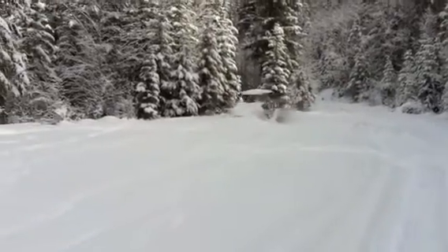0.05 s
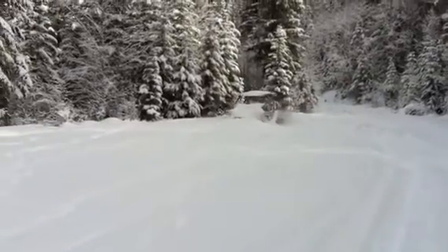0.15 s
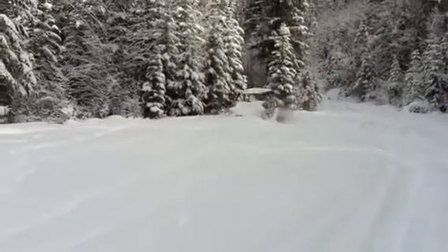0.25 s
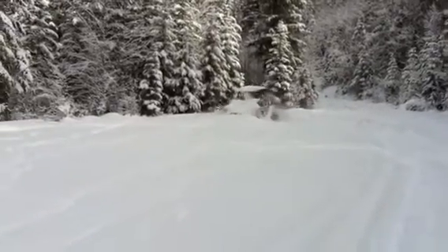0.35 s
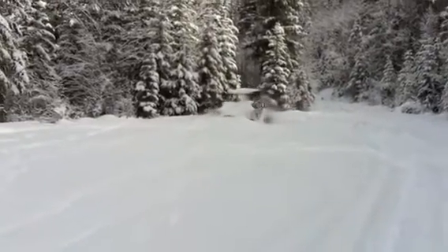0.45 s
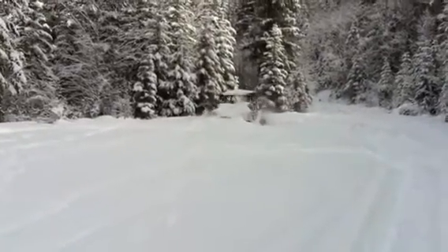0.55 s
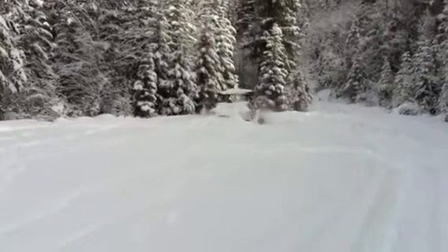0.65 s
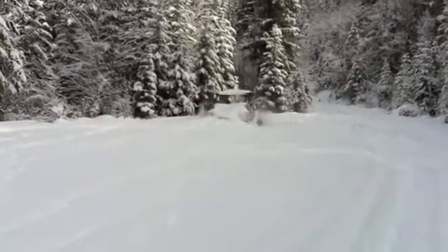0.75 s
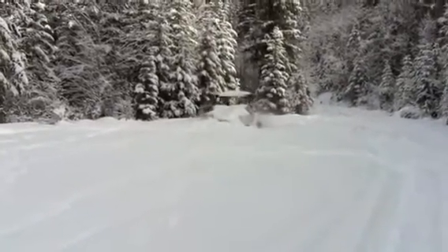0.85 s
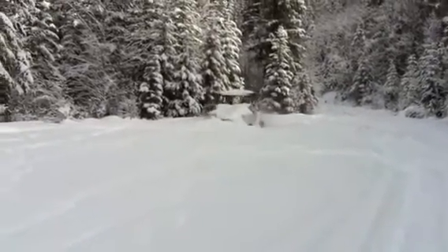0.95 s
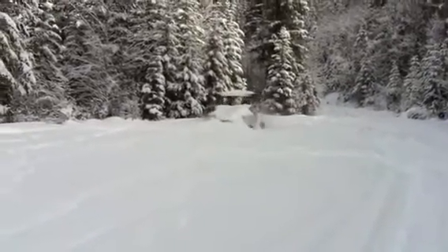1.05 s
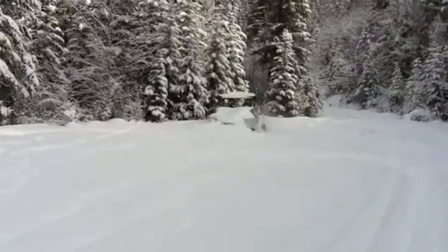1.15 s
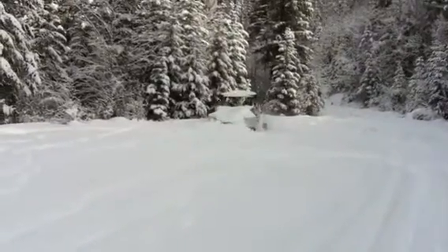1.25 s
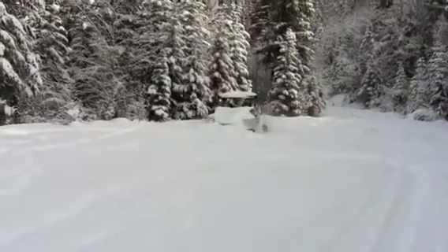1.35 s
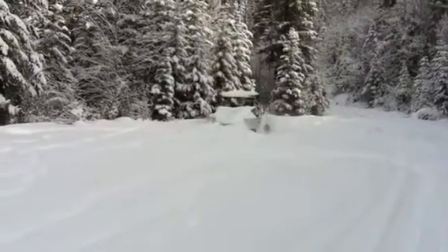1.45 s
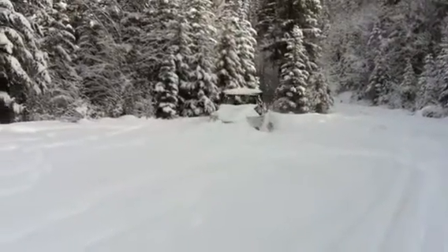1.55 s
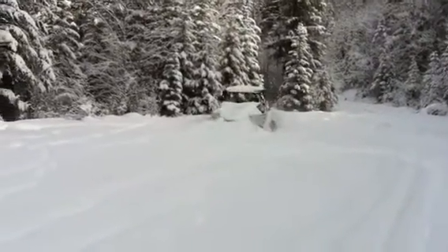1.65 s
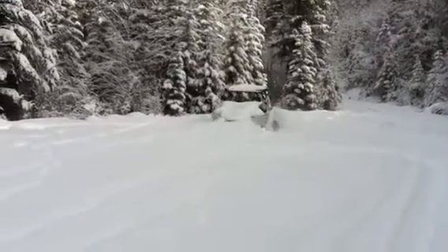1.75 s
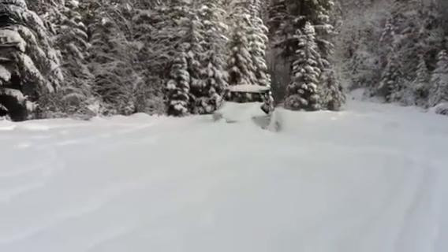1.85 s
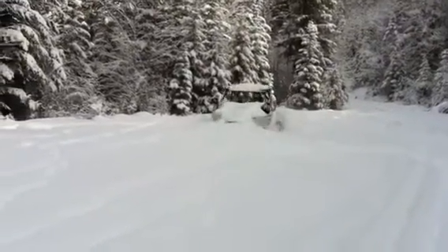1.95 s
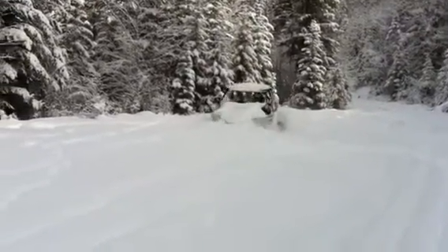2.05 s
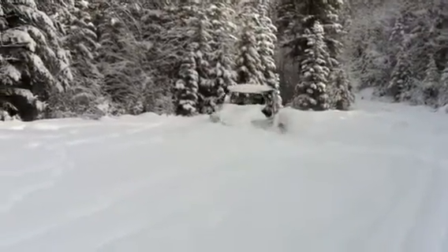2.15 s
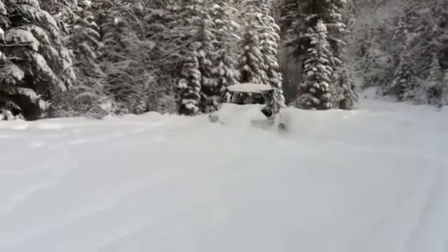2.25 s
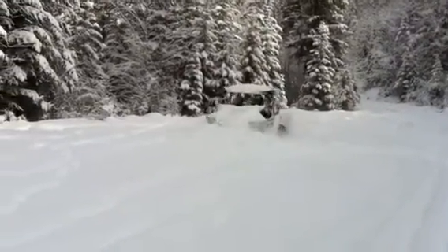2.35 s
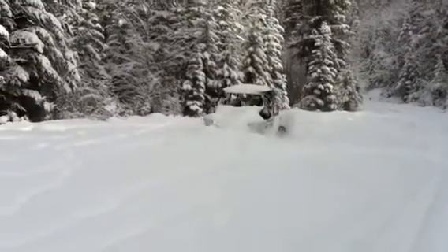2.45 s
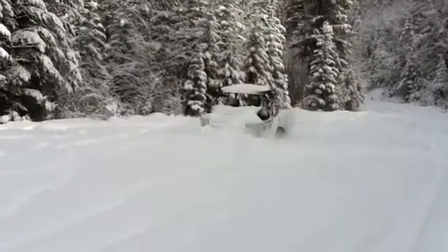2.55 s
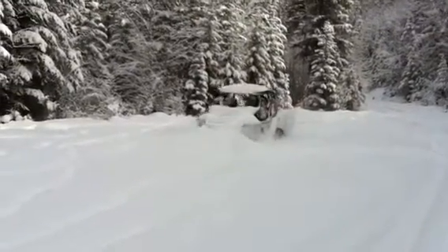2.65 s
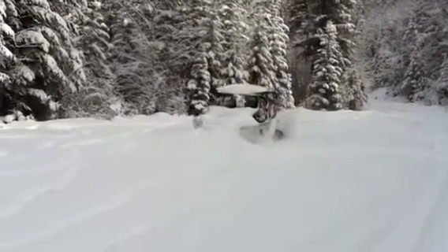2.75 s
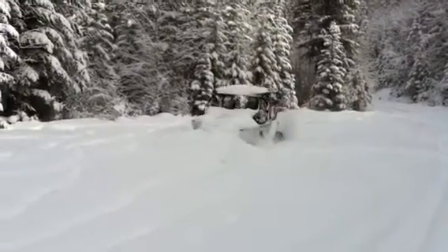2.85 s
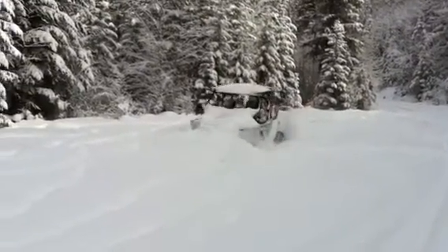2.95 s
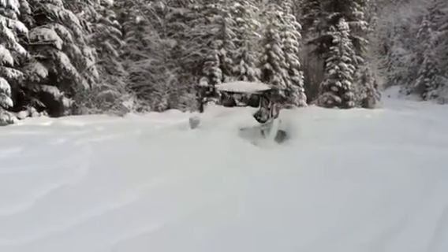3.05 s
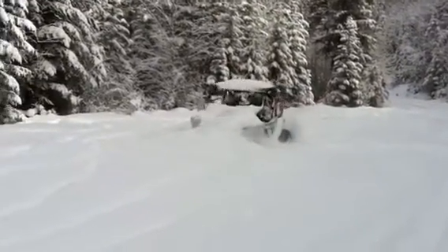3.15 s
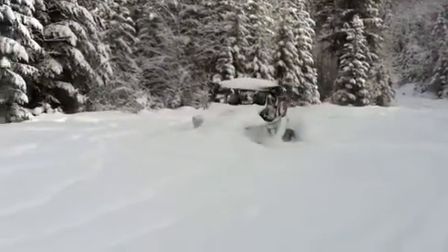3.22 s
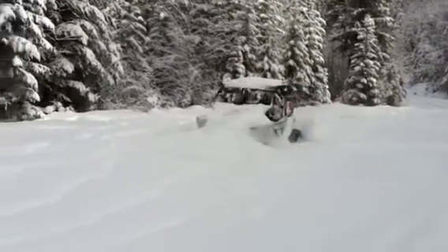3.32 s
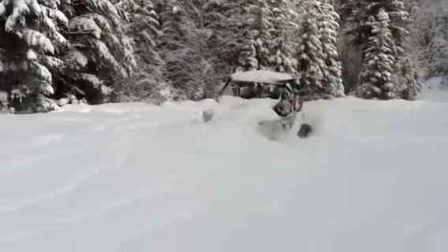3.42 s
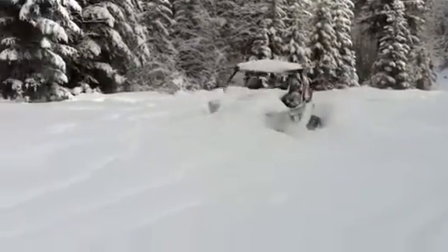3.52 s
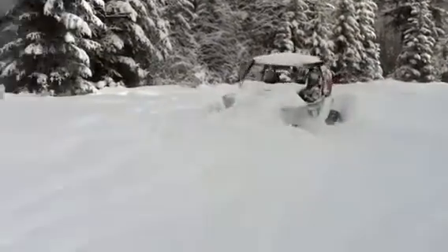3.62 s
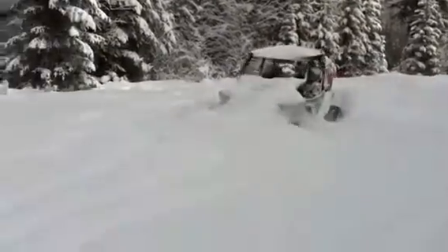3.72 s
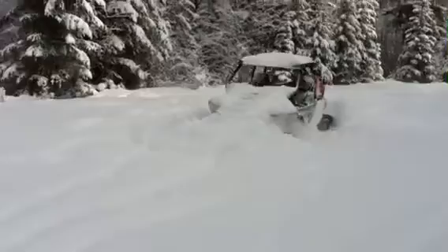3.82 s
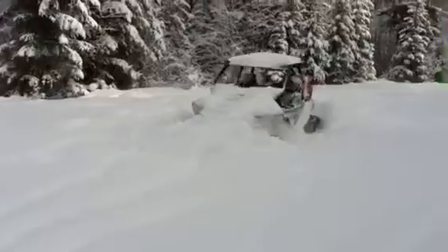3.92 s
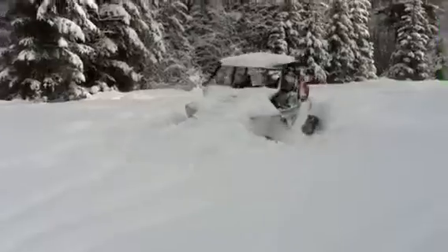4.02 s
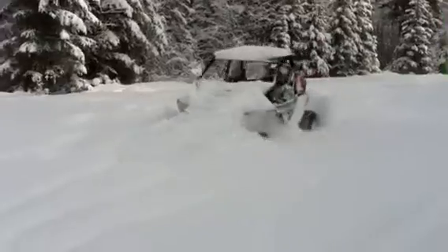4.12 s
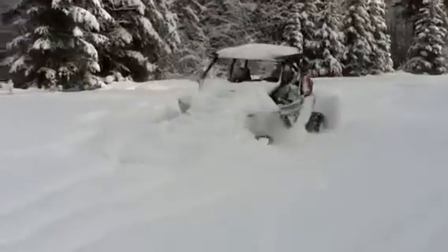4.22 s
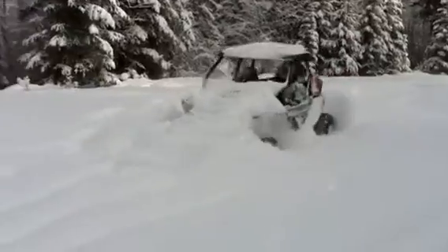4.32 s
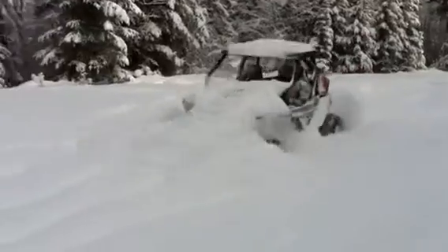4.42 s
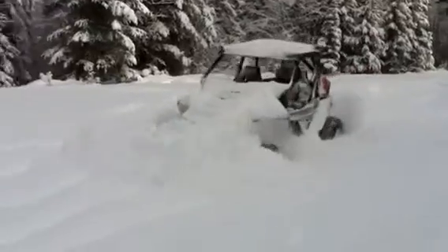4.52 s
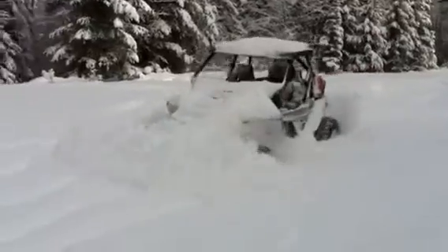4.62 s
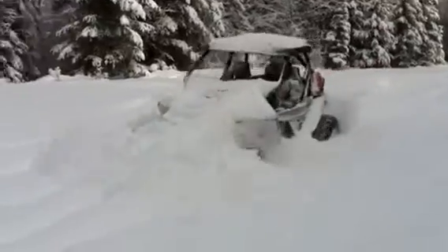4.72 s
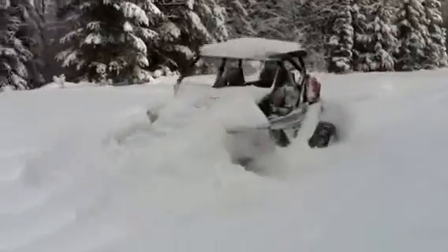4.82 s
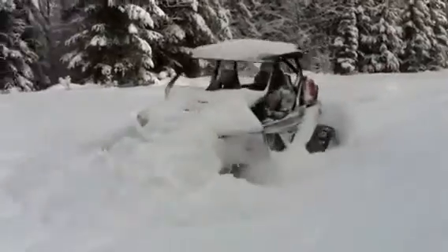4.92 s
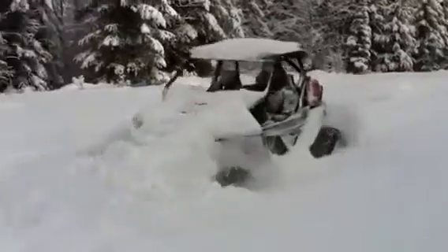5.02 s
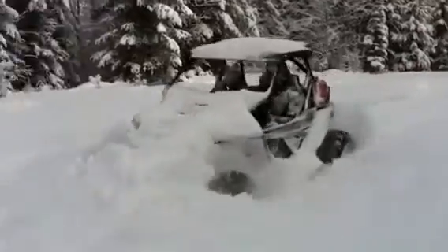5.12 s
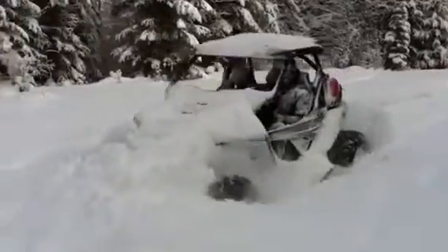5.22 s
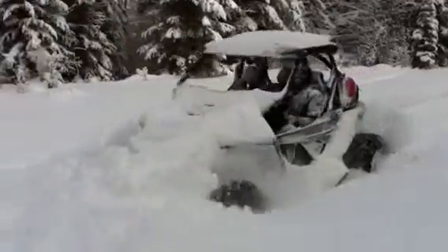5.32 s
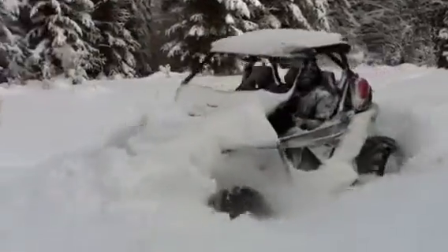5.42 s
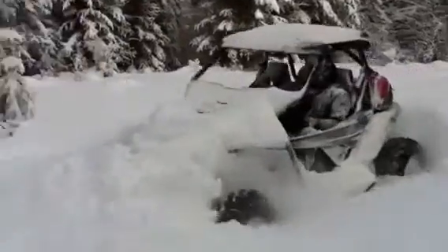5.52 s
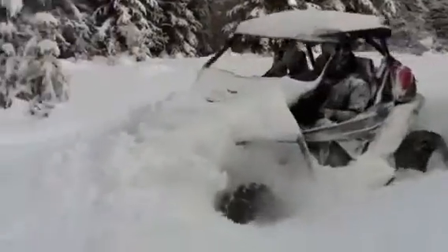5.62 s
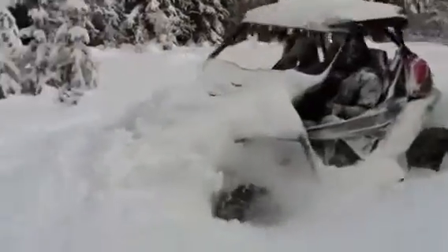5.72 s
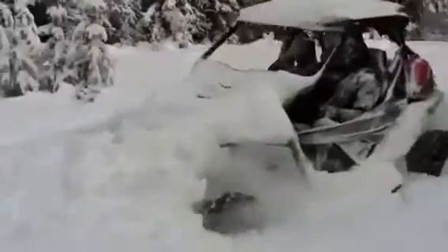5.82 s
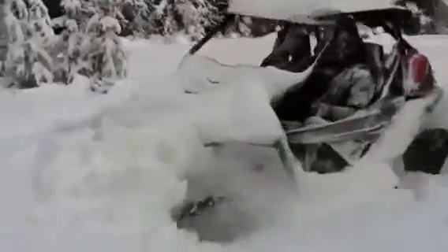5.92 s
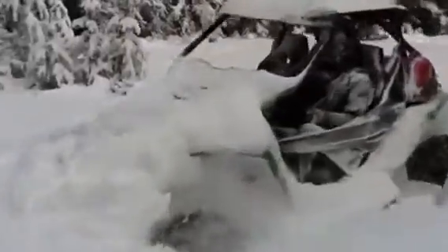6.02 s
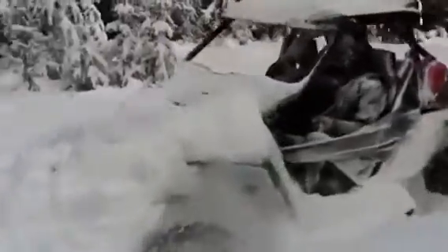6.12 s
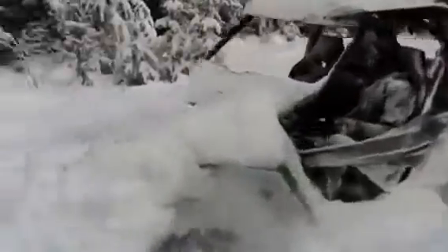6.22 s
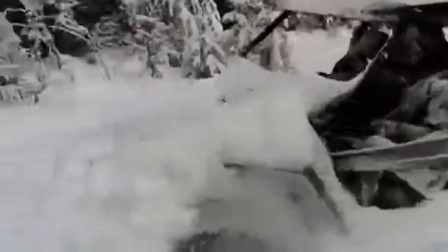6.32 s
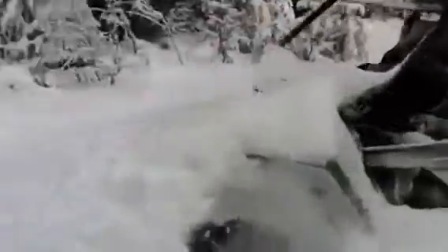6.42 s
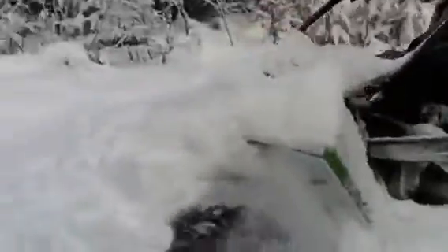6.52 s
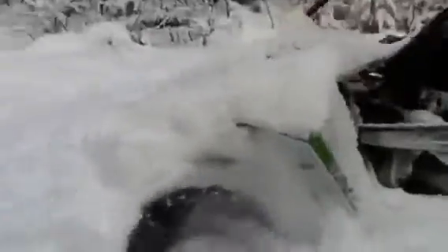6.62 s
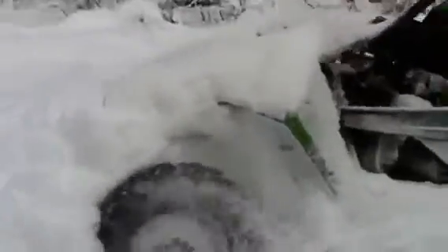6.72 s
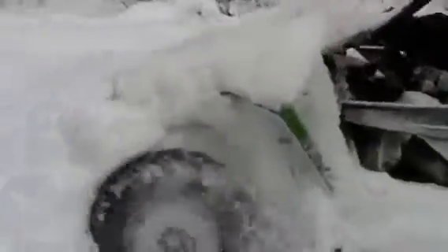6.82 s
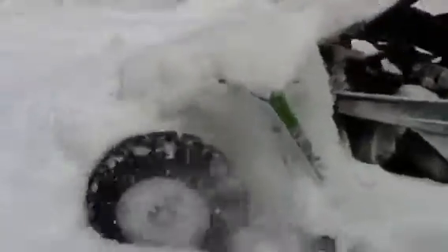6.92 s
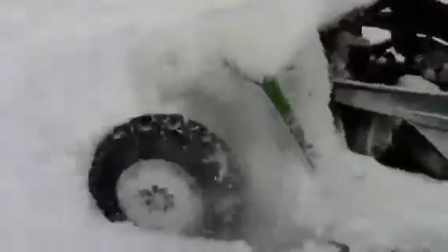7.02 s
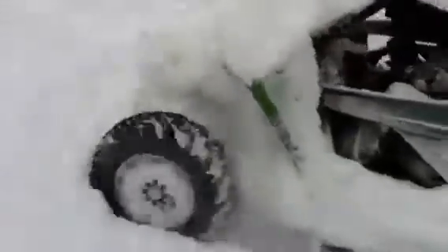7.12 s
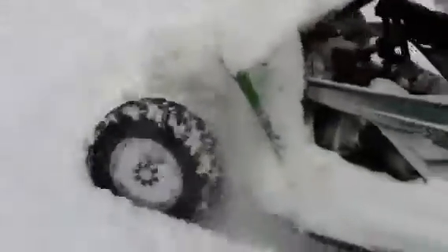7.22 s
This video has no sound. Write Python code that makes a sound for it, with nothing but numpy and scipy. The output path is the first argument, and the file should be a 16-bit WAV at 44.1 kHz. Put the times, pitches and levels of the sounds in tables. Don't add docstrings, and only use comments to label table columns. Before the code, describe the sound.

A snow-ploughing off-road vehicle comes towards a fixed microphone in the open. Its uneven, rapidly pulsing engine stays at one pitch, quiet at first, with dry mechanical ticking and muffled rasp. Gear whine creeps in, hissing snow spray brightens, and a dull ice knock lands on the body near six seconds. The sound ends at its loudest, with deep exhaust boom and sharp clatter close up.

```python
import sys
import numpy as np
from scipy import signal
from scipy.fft import rfft, irfft, next_fast_len
from scipy.io import wavfile
from scipy.ndimage import uniform_filter1d, map_coordinates

SR = 44100
rng = np.random.default_rng(int(sys.argv[2]) if len(sys.argv) > 2 else 0)


def bounce(signal):
    frames = np.transpose(np.atleast_2d(signal))
    limited = np.clip(frames, -1, 1)
    pcm = np.round(limited * 32767).astype(np.int16)
    wavfile.write(sys.argv[1], SR, pcm)


def convert_level_to_amplitude(level_db):
    exponent = np.asarray(level_db, float) / 20
    return 10 ** exponent


N = 320166

# time in seconds, engine cycles in Hz, exhaust boom in dB.
ENGINE = [(0, 49.65, -54), (.22, 48.63, -52), (.71, 50.3, -50.5), (1.05, 49.7, -49), (1.5, 50.67, -47),
          (1.94, 50.3, -45.5), (2.14, 51.24, -44.5), (2.48, 49.7, -45.5), (3.3, 49.3, -42),
          (3.8, 50.46, -41), (4.4, 49.2, -38.5), (4.9, 50.01, -38), (5.4, 49.44, -38), (5.8, 49.97, -36.5),
          (6.2, 49.36, -30), (6.45, 49.48, -27), (6.9, 49.94, -23.5), (7.26, 50.26, -21.5)]
# time in seconds, nearness from 0 to 1.
APPROACH = [(0, 0.19), (3, 0.19), (4.4, 0.28), (5, 0.39), (5.8, 0.54), (6.2, 0.67), (6.6, 0.99), (7.26, 1)]
# time in seconds, noise loudness in dB, exposure of bare metal in dB.
PASSAGE = [(0, -52, 2), (.4, -52, -2), (1, -53.5, -2.5), (2.3, -49, -5.5), (3.1, -47, -3), (3.9, -45.5, -1),
           (4.6, -42.5, 0), (5.2, -39.5, -1), (5.55, -37, -0.5), (5.75, -35, -1), (6.2, -33.5, 0.5),
           (6.6, -31, -2.5), (6.85, -29, -0.5), (7.26, -28, 4)]

# order (multiple of the cycle rate), level in dB.
ORDERS_FAR = [(1, -30), (2, -24), (3, -6.5), (4, -0.5), (5, 0), (6, -24), (7, -23), (8, -16), (9, -29.5),
              (10, -30), (11, -34.5), (12, -16), (13, -31), (14, -29), (15, -23), (16, -18.5), (17, -22.5),
              (18, -19.5), (19, -22.5), (20, -77)]
ORDERS_MID = [(1, -38), (2, -12.5), (3, -4), (4, -4), (5, -0.5), (6, -3), (7, -18.5), (8, -16.5),
              (9, -10.5), (10, -15.5), (11, -14), (12, -27), (13, -9), (14, -13), (15, -13.5), (16, -28),
              (17, -16), (18, -22), (19, -17.5), (20, -12)]
ORDERS_NEAR = [(1, -43), (2, -19), (3, -19.5), (4, -11.5), (5, 0), (6, -15.5), (7, -11.5), (8, -12),
               (9, -19), (10, -17), (11, -15), (12, -22), (13, -39), (14, -33), (15, -37), (16, -23),
               (17, -48), (18, -33), (19, -25), (20, -33)]
# middle in seconds, half length in seconds, loss in dB.
THIRD_ORDER_FADES = [
    (.25, 0.19, 2.5),
    (7.1, 0.16, 4),
]
FOURTH_ORDER_FADES = [(.22, 0.2, 8.8), (2.7, 0.19, 6.7), (3.35, .15, 4.5), (4.25, .25, 5.3),
                      (5.5, .15, 4.4), (7.05, .25, 11.55)]

# frequency in Hz, density in dB per Hz.
RASP_FAR = [(20, -23), (65, -29), (120, -14), (245, -8.5), (400, -17), (520, -20), (700, -7), (910, -7),
            (1100, -8.5), (1500, -13.5), (1800, -9.5), (2100, -14), (2400, -20), (3200, -56)]
RASP_NEAR = [(20, -39), (85, -20), (173, -14.5), (245, -0.5), (300, -10), (400, -6.5), (750, -10),
             (1050, -11), (1260, -9.5), (1450, -13), (1750, -11), (1950, -18), (2300, -34.5), (3200, -68)]
BELT = [(1800, -39), (2150, 4.5), (2400, 2), (2700, 3.5), (3050, 2.5), (3400, -12)]
CLATTER_FAR = [(2700, -16.5), (3200, -6), (3800, -1.5), (4100, 1), (4350, -6), (5000, -5.5), (5420, 0),
               (5650, -6), (5900, -10), (7000, -12.5), (9000, -27)]
CLATTER_NEAR = [(2700, -26), (3150, 2), (3500, -1.5), (3800, -0.5), (4050, -6), (4600, -9.5), (5400, -6),
                (6400, -6), (7500, -6), (9000, -17)]
SPRAY_FAR = [(5000, -19), (6500, -14), (8000, 1), (10000, 0), (12500, -6), (15500, -5), (16500, -32)]
SPRAY_NEAR = [(5000, -1), (6500, -12), (8000, 2), (10000, 2.5), (12500, 3), (15500, -1), (16500, -30)]

# pitch in Hz, width in Hz, far level in dB, near level in dB.
PANELS = [(922, 54.8, -15.5, -31), (1637, 99, -25, -5.5), (1815, 40, -20.5, -13.5),
          (3752, 105, -20.5, -14.5), (4085, 31, -23.5, -18.5), (4330, 200, -15, -27), (5430, 280, -24, -45),
          (7700, 180, -31, -24)]
# middle in seconds, half length in seconds, loss in dB.
BURIALS = [
    (4.2, 0.97, 6.5),
    (5.2, 0.36, 4),
    (6.664, 0.3, 8.5),
]
# time in seconds, pitch in Hz.
GEAR_MESH = [(2.3, 1322), (2.92, 1334), (3.48, 1314), (3.8, 1366), (4.39, 1323), (5.1, 1336), (5.7, 1325),
             (6.2, 1262), (7.26, 1255)]
# time in seconds, peak in dB, pitch in Hz.
ICE_KNOCKS = [
    (2.888, -32, 794),
    (6.168, -18, 934),
]

SECOND_FIRING = .40
THUMP_DELAY = .2
BELT_DB, CLATTER_DB, SPRAY_DB, WHINE_DB = -11, -5.5, -17.5, -11
SPRAY_NEAR_DB, SPRAY_FOLLOWS = 7.5, .79
PANEL_CURVE = 2.4
WHINE_FROM_S, WHINE_RISE_S = 1.8, .18
ECHO_FAR_MS, ECHO_GROWTH_MS, ECHO_CURVE = .291, .08, 2.3
ECHO_LEAST, ECHO_CLOSE, ECHO_MIDWAY = .2, .16, 1.6


def rms_one(x):
    return x / np.sqrt(np.mean(x ** 2) + 1e-20)


def in_time(rows):
    s, *columns = np.transpose(rows)
    return [np.interp(np.arange(N) / SR, s, c) for c in columns]


def drift(rate_hz):
    pole = np.exp(-2 * np.pi * rate_hz * 40 / SR)
    noise = rng.standard_normal(N // 40 + 2002)
    slow = signal.lfilter([1], [1, -2 * pole, pole * pole], noise)[2000:]
    return np.interp(np.arange(N) / 40, np.arange(len(slow)), rms_one(slow))


def fades_db(rows):
    t = np.arange(N) / SR
    return -sum(db * np.exp(-((t - s) / half_s) ** 2) for s, half_s, db in rows)


def colour(x, spectrum):
    hz, db = np.transpose(spectrum)
    size = next_fast_len(N)
    log_hz = np.log(np.arange(size // 2 + 1) * SR / size + 1)
    gain = convert_level_to_amplitude(np.interp(log_hz, np.log(hz), db, -90, -90))
    return rms_one(irfft(rfft(x, size) * gain, size)[:N])


def puffs(turns, first_db, second_db, decay, scatter_db):
    gate = np.ones(N)
    for delay, db in ((0, first_db), (SECOND_FIRING, second_db)):
        cycles = turns - delay + 1
        since = cycles % 1 / decay
        strength = convert_level_to_amplitude(db + scatter_db * rng.standard_normal(500)[cycles.astype(int)])
        gate = gate + strength * since * np.exp(1 - since)
    return gate


def approaching(gate, near, far_spectrum, near_spectrum):
    noise = rng.standard_normal(N) * gate
    blend = (1 - near) * colour(noise, far_spectrum) + near * colour(noise, near_spectrum)
    return blend / np.sqrt(uniform_filter1d(blend ** 2, size=SR))


def exhaust(turns, near, boom_db):
    out = np.zeros(N)
    faded_db = {3: fades_db(THIRD_ORDER_FADES), 4: fades_db(FOURTH_ORDER_FADES)}
    for (order, far_db), (_, mid_db), (_, near_db) in zip(ORDERS_FAR, ORDERS_MID, ORDERS_NEAR):
        k = round(order)
        db = boom_db + np.interp(near, [0, .5, 1], [far_db, mid_db, near_db])
        loose = max(k - 4, 1)
        waver_db = .45 * np.sqrt(loose) * drift(8) + .3 * min(loose - 1, 4) * drift(1.5)
        waver_db = waver_db + faded_db.get(k, 0) + (k == 4) * 2 * near * drift(12)
        lead = .32 * max(4 - k, 0) ** 1.5
        trail = (THUMP_DELAY * (k - 7) - .15) * (k > 6) * (1 - .8 * near ** 4)
        slip = .005 * loose * drift(5)
        out += convert_level_to_amplitude(db + waver_db) * np.cos(2 * np.pi * (k * turns + lead - trail + slip))
    return np.sqrt(2) * out


def panels(gate, near):
    out = np.zeros(N)
    noise = rng.standard_normal(N) * gate
    for hz, width_hz, far_db, near_db in PANELS:
        pole = np.exp(-np.pi * width_hz / SR)
        ring = signal.lfilter([1, 0, -1], [1, -2 * pole * np.cos(2 * np.pi * hz / SR), pole * pole], noise)
        db = far_db + near ** PANEL_CURVE * (near_db - far_db)
        out += rms_one(ring) * convert_level_to_amplitude(db + 1.6 * drift(1.5))
    return out


def rasp(firings, valves, near, loud_db):
    return convert_level_to_amplitude(loud_db) * (approaching(firings, near, RASP_FAR, RASP_NEAR) + panels(valves, near))


def belt(firings, near, loud_db):
    return convert_level_to_amplitude(loud_db + BELT_DB + fades_db(BURIALS)) * approaching(firings, near, BELT, BELT)


def clatter(valves, near, loud_db, bare_db):
    return convert_level_to_amplitude(loud_db + CLATTER_DB + bare_db) * approaching(valves, near, CLATTER_FAR, CLATTER_NEAR)


def spray(valves, near, loud_db, bare_db):
    db = loud_db + SPRAY_DB + SPRAY_FOLLOWS * bare_db + SPRAY_NEAR_DB * near ** 2
    return convert_level_to_amplitude(db) * approaching(valves * convert_level_to_amplitude(.32 * drift(14)), near, SPRAY_FAR, SPRAY_NEAR)


def ground_echo(x, near):
    lag_ms = ECHO_FAR_MS + ECHO_GROWTH_MS * near ** ECHO_CURVE
    lag = lag_ms * (1 + .006 * drift(6)) * SR / 1000
    strength = ECHO_LEAST + ECHO_CLOSE * near + ECHO_MIDWAY * near ** 2 * (1 - near)
    strength = strength * convert_level_to_amplitude(1.5 * drift(8))
    late = map_coordinates(x, [np.arange(N) - lag], order=3)
    return (x - strength * late) / np.sqrt(1 + strength ** 2)


def whine(db):
    hz, = in_time(GEAR_MESH)
    load = .14 + .63 / (1 + np.exp((WHINE_FROM_S - np.arange(N) / SR) / WHINE_RISE_S))
    phase = 2 * np.pi * np.cumsum(hz + 5.7 * drift(20.94)) / SR
    return np.sqrt(2) * load * convert_level_to_amplitude(db + 2.2 * drift(8.37)) * np.sin(phase)


def knocks():
    out, t = np.zeros(N), np.arange(800) / SR
    shape = t / .0008 * np.exp(1 - t / .0008)
    for s, db, hz in ICE_KNOCKS:
        out[round(s * SR):][:len(t)] -= convert_level_to_amplitude(db) * shape * np.sin(2 * np.pi * hz * t)
    return out


def scene():
    cycles_hz, boom_db = in_time(ENGINE)
    loud_db, bare_db = in_time(PASSAGE)
    near = np.clip(in_time(APPROACH)[0], 0, 1)
    turns = np.cumsum(cycles_hz) / SR
    thump = turns - THUMP_DELAY * (1 - .8 * near ** 4)
    firings = puffs(thump, -5 + 9 * near, -9 + 8 * near, .06, .69)
    valves = puffs(thump, -13 + 9 * near, -10 + 11 * near, .074, 2.7)
    engine = exhaust(turns, near, boom_db) + rasp(firings, valves, near, loud_db)
    engine = engine + belt(firings, near, loud_db) + whine(loud_db + WHINE_DB)
    treble = clatter(valves, near, loud_db, bare_db) + spray(valves, near, loud_db, bare_db)
    return (engine + ground_echo(treble, near) + knocks())[None]


def thin_weak_patches(x, depth_db, from_hz):
    hz, _, cells = signal.stft(x, SR, nperseg=2048)
    power = np.abs(cells) ** 2
    patch = uniform_filter1d(power, size=7, axis=-2)
    around = uniform_filter1d(uniform_filter1d(power, size=110, axis=-2), size=3, axis=-1)
    steep = (from_hz / np.maximum(hz, 1))[:, None] ** .65
    cells[patch < around * convert_level_to_amplitude(2 * depth_db * steep)] *= .03
    return signal.istft(cells, SR, nperseg=2048)[1][..., :N]


def roll_off(x):
    return signal.sosfilt(signal.butter(12, 15740, fs=SR, output="sos"), x)


def record(dry):
    thinned = thin_weak_patches(dry, depth_db=-4.6, from_hz=12000)
    return roll_off(thinned)


dry = scene()
out = record(dry)
bounce(out)
```